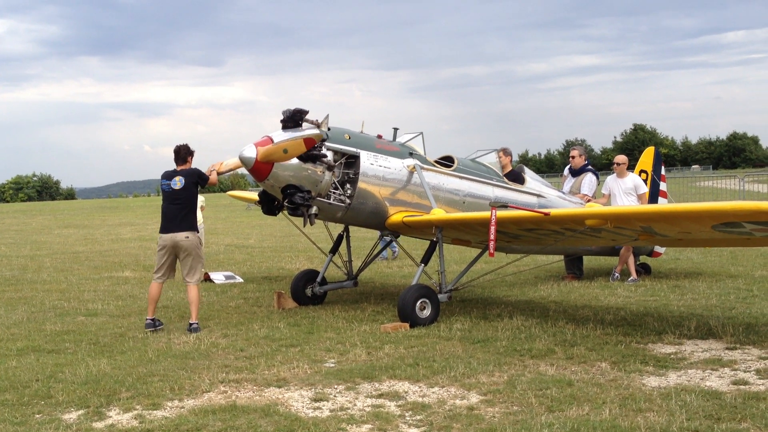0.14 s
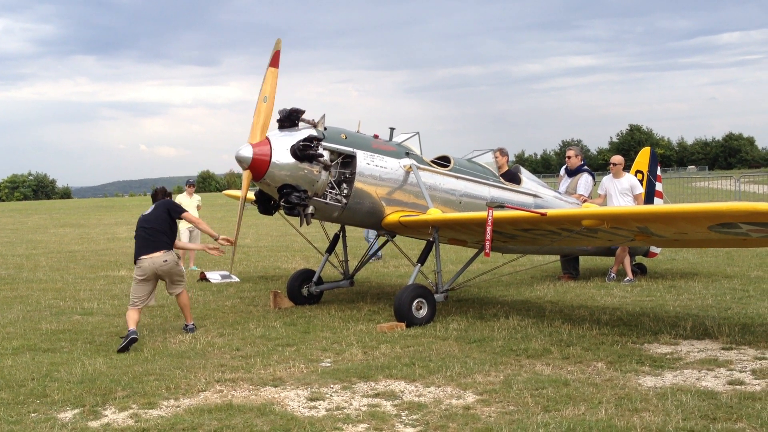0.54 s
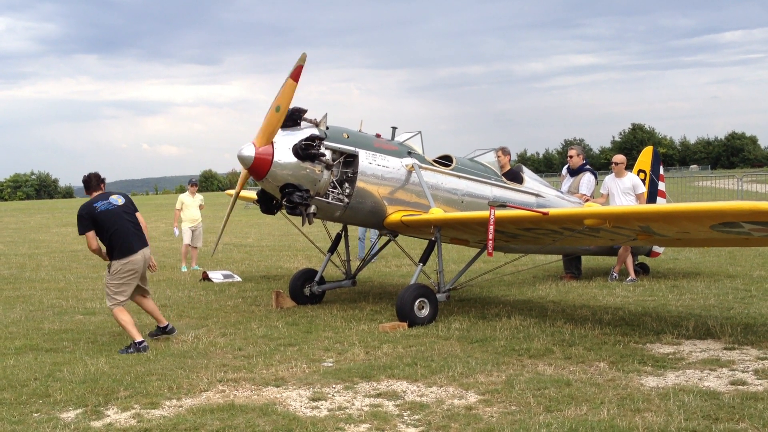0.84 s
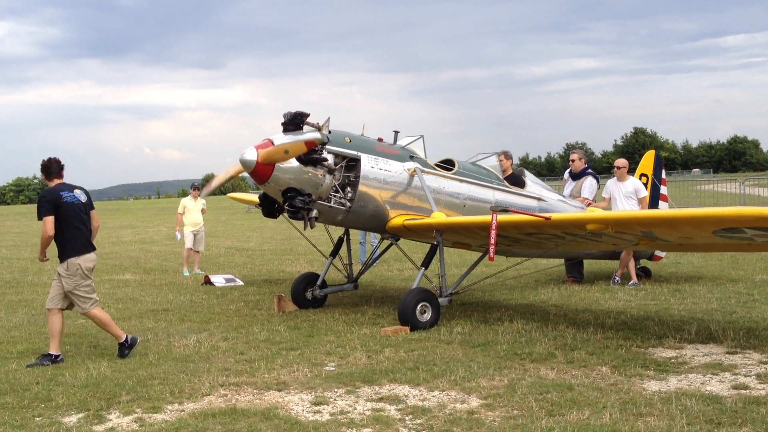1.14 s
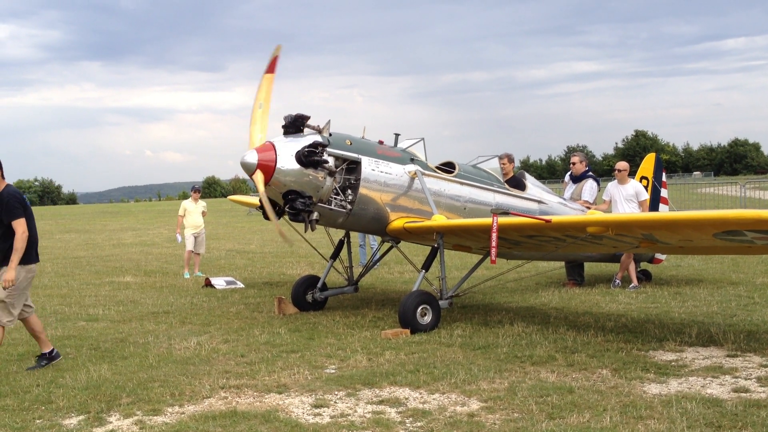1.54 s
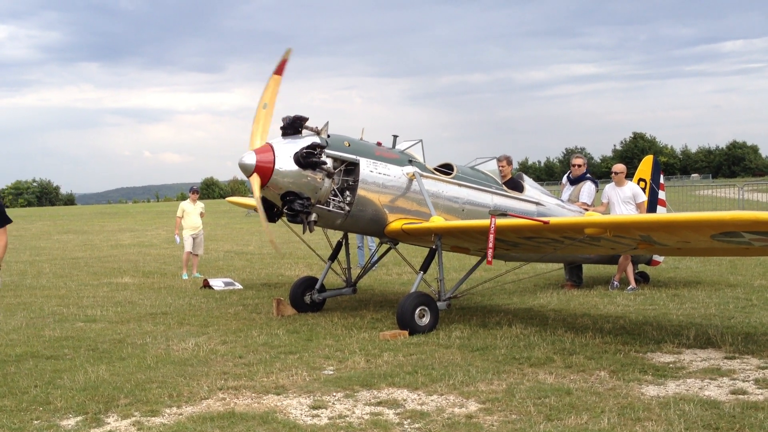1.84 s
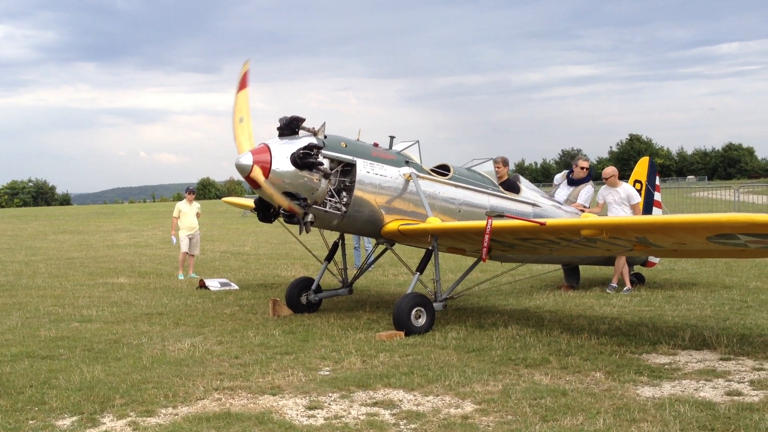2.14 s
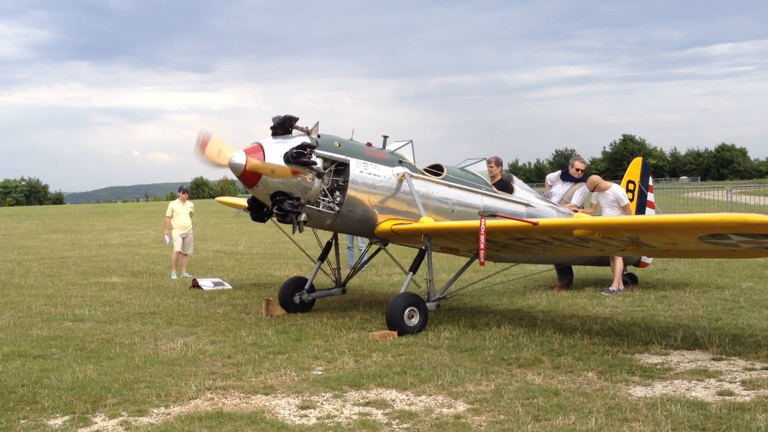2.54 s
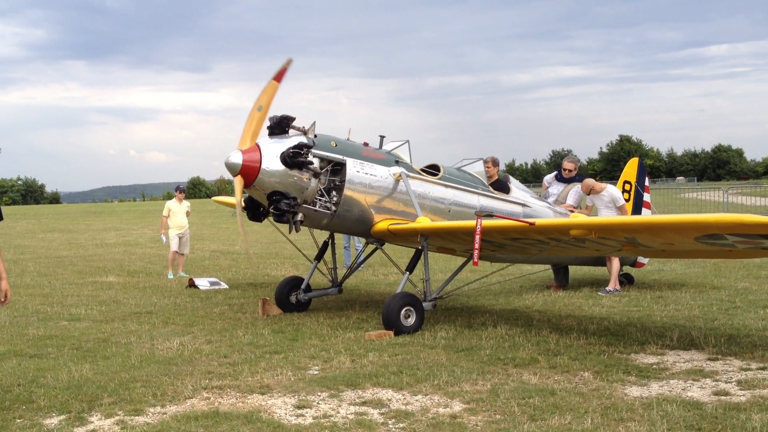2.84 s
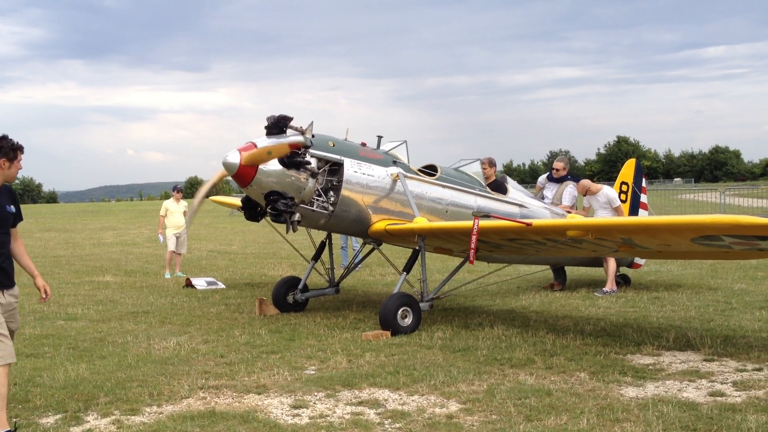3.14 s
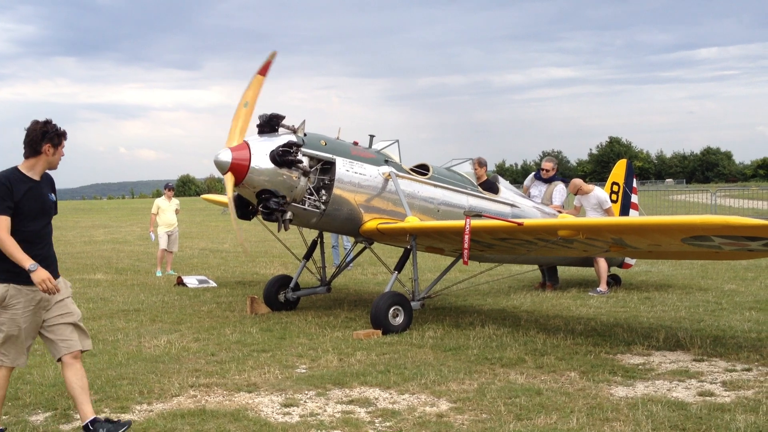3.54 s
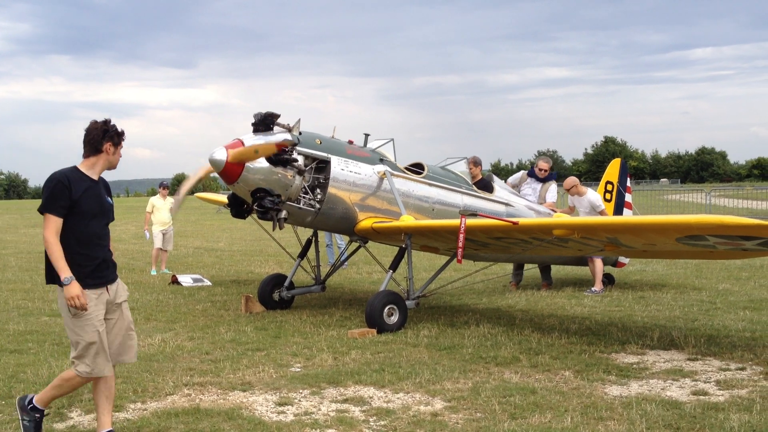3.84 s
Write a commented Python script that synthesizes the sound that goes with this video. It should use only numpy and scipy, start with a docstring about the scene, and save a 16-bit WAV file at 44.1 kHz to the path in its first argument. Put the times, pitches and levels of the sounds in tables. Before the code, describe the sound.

A radial aircraft engine starts by hand on a grass field: quiet knocks and wheezes, a cough, loud first bangs, then a fast, uneven popping idle with growing rumble and propeller hiss, picked up by one mono microphone.

```python
"""Radial engine hand-started on grass

A five-cylinder radial aircraft engine on a grass field is swung by hand, wheezes through two compressions,
catches and runs up to a popping idle. Each firing is a puff of rough noise coloured by its short stack pipe;
the two stacks nearest the microphone are loudest. Gliding tones make the low exhaust thumps, shaped noise the
rumble, roar and propeller hiss, and ringing tones the knocks and clicks of the valve gear.
Another engine throbs faintly far away as soft low tones over the open-air floor."""
import sys
import numpy as np
from scipy import signal
from scipy.fft import rfft, irfft
from scipy.io import wavfile
from scipy.ndimage import uniform_filter1d

SR = 44100
rng = np.random.default_rng(int(sys.argv[2]) if len(sys.argv) > 2 else 0)


def volts_from_db(level):
    """Convert decibel levels to linear amplitude ratios."""
    exponent = np.asarray(level, float) / 20
    return 10 ** exponent


def store_pcm(level_fs):
    """Save levels as 16-bit WAV."""
    pcm = np.round(np.clip(level_fs, -1, 1) * 32767).astype(np.int16)
    wavfile.write(sys.argv[1], SR, np.atleast_2d(pcm).T)


N = 176400  # samples, 4 s

# open-air floor of the field, spectrum: f/Hz, density/dB (relative)
AIR = [(18, -64), (30, -30), (160, 0), (256, -2.5), (315, -14), (379, -9), (897, -24), (7080, -36),
       (9940, -41), (15500, -35)]
AIR_DB = -56.5
# throbs of the far engine: t/s (10 ms after the onset), level/dB, f/Hz (middle of a small upward glide)
FAR_THROBS = [(0.051, -54, 162), (0.099, -48, 251), (0.168, -44, 223), (0.209, -44, 247), (0.288, -50, 154),
              (0.345, -44, 140), (0.379, -52, 153), (0.418, -50, 170), (0.476, -44, 182), (0.54, -53, 248),
              (0.6, -51, 134), (0.699, -71.5, 207), (0.759, -60, 156), (0.813, -56, 155), (0.869, -53, 122),
              (0.949, -49, 133), (0.999, -55, 148)]
THROB_S = .035  # whole length

# dull knocks of the valve gear during the swing: t/s, level/dB, f/Hz
KNOCKS = [(0.5, -43.5, 574), (0.559, -43, 570), (0.621, -45, 635), (0.685, -30.5, 522), (0.719, -38.5, 487),
          (0.775, -47, 620), (0.839, -46, 654), (0.914, -33, 1120), (0.952, -41, 540), (0.969, -32, 625),
          (0.985, -33, 580), (1.009, -36, 590), (1.031, -34, 584), (1.044, -37, 565)]
KNOCK_RISE_S, KNOCK_T60_S, KNOCK_RATTLE_DB = .005, .06, -7
# gliding squeak of a leaking valve: t/s, f/Hz, level/dB
SQUEAK = [(.55, 5200, -78), (0.581, 6200, -68), (.605, 7400, -64), (.65, 7500, -54), (.68, 7500, -83)]

# first firings, every cylinder in turn, starting with the third: t/s of the peak, level/dB
CATCH = [(1.082, -11.5), (1.1604, -13.5), (1.2253, -15), (1.2678, -11.5), (1.3201, -18), (1.3598, -16),
         (1.3967, -22.5), (1.4397, -27)]
# pops of the two near stacks, first and third cylinder in turn: t/s of the peak, level/dB
NEAR_POPS = [(1.471, -14.0), (1.5422, -16), (1.638, -12), (1.7017, -13.5), (1.7902, -14.5), (1.852, -14.5),
             (1.9391, -13.5), (2.0027, -20), (2.0878, -14.5), (2.1477, -16.5), (2.2313, -14.5),
             (2.2925, -18.5), (2.3769, -16), (2.4371, -17.5), (2.5202, -16.2), (2.5795, -15), (2.6634, -13),
             (2.7206, -16.5), (2.8031, -13.5), (2.8636, -19), (2.943, -16.5), (3.0017, -20), (3.0836, -16),
             (3.141, -18.5), (3.2237, -15.8), (3.281, -19.5), (3.3626, -17), (3.4193, -17), (3.5023, -14.5),
             (3.5599, -16.5), (3.6422, -17), (3.701, -17.5), (3.7826, -16.5), (3.8425, -16.5),
             (3.9249, -13.5), (3.9812, -15.5)]
IDLE_STEP_S = 0.03  # one of the five firing steps of a cycle, at idle

# engine power: t/s, thump level/dB, roar level/dB, hiss level/dB
POWER = [(1.061, -56, -40, -47), (1.086, -31, -50, -60), (1.13, -33, -40, -53), (1.2, -28, -37.5, -39.5),
         (1.265, -21.5, -38.5, -39), (1.33, -37, -41.5, -41.5), (1.5, -28, -39, -33.5),
         (1.8, -26.5, -36, -31), (2.3, -24, -33, -29), (3., -22, -30.5, -27.5), (3.6, -20, -29.5, -27),
         (4., -20, -30.5, -25)]
# exhaust rumble, spectrum: f/Hz, density/dB (relative)
RUMBLE = [(40, -50), (70, -26), (110, -2), (178, -11.5), (280, -1), (350, -29), (450, -42), (600, -90)]
RUMBLE_DB = -15  # relative to the thump level
# exhaust roar, spectrum: f/Hz, density/dB (relative)
ROAR = [(200, -48), (340, -12), (372, -12), (538, 1.5), (634, 3), (840, -20.5), (967, -3), (1250, -8.5),
        (1420, -11.5), (2000, -11.5), (2600, -46), (4400, -120)]
# propeller hiss, spectrum: f/Hz, density/dB (relative)
HISS = [(710, -11), (1200, -1.5), (1440, -10), (2290, -5.5), (2540, -10), (4220, -6.5), (5000, -11),
        (6650, -5), (9930, -16), (15000, -19.5)]
TICKS_PER_S, TICK_DB, TICK_SPREAD_DB = 500, -6, 3.34  # valve-gear clatter, level relative to the hiss

# low exhaust thumps of one cycle: half-length/s, start f/Hz, end f/Hz, level/dB (relative to thump level)
THUMPS = [(0.01543, 213, 161, -1.5), (0.0184, 111.6, 217, 0), (0.00914, 238, 308, -4.5),
          (.008, 213, 240, 2), (0.00852, 178, 183, -2), (0.01933, 110.7, 226, -3.5),
          (0.01076, 246, 272, -8), (0.0161, 135, 172, -5), (0.01214, 212.5, 274, -5.5),
          (0.00708, 1170, 1170, -9.5), (0.01104, 572, 690, -5.5), (.011, 612, 780, -9),
          (0.01094, 533, 563, -16), (0.0083, 631, 507, -14)]
# where each thump is centred: place/steps in the five-step cycle
THUMP_PLACES = [.3, .93, 1.3, 1.9, 2.37, 3., 3.5, 4.25, 4.8, 0., 1.1, 1.95, 3.1, 4.05]
THUMP_SPREAD_DB, THUMP_JITTER_S = 1.5, .0002

# body of the cough and the first bangs: t/s of the centre, half-length/s, f/Hz, level/dB
BANGS = [(.925, .014, 1150, -41), (.93, .018, 2215, -34), (.93, .014, 4150, -50), (.92, .01, 6900, -44),
         (1.075, .014, 248, -32), (1.085, 0.013, 1100, -22.5), (1.163, .016, 1180, -23.5),
         (1.165, 0.012, 1730, -24), (1.215, 0.013, 230, -36), (1.262, 0.01185, 259, -25),
         (1.268, 0.0092, 2320, -13.5), (1.226, .01, 4200, -16.5)]

# stacks on the far side: place/steps in the five-step cycle, cold level/dB, warm level/dB, spread/dB
FAR_STACKS = [(1.078, -22.5, -32, 7.5), (2.978, -31, -30.5, 3.5), (4.1, -40.5, -43, -1.5)]
# puffs while the propeller is swung: start t/s, level/dB, rise/s, decay/s, treble tilt/dB per octave
WHEEZES = [(.497, -51, 0.0027, 0.02, 3), (.611, -52, 0.0044, 0.063, -10.5), (0.683, -52, 0.0023, 0.046, -7),
           (0.727, -53, 0.0016, .008, -10), (0.767, -58, .003, 0.018, -12), (.813, -50, 0.0037, 0.023, -13),
           (.831, -45.5, 0.0025, 0.023, 2), (0.871, -53, 0.0037, 0.026, -18),
           (.906, -33.5, 0.025, 0.021, -3), (.952, -33.5, 0.0014, 0.017, -20),
           (0.973, -48.5, 0.0068, 0.082, -11), (1.028, -47, .004, 0.073, -11)]
WHEEZE_RING = 1.1  # slow gas rings the pipes more: factor on the resonance dB
# gas noise before the pipe, spectrum: f/Hz, density/dB (relative)
PUFF = [(290, -44), (500, -14), (1140, -8.5), (1450, -8), (2230, -0.5), (2570, -2), (6480, -6.5),
        (9510, -12.5), (11300, -13), (15000, -15)]
# resonances of the stack pipe: f/Hz, width/Hz, boost/dB
STACK = [(1150, 280, 9), (2225, 83, 4.5), (2840, 67, 1), (4200, 137, 8.5), (6760, 2100, 5)]
# colour of each cylinder: level/dB added at the top resonance, treble tilt/dB per octave
COLOUR = [(1.5, 2), (3, 1), (3, 1), (0, -0.5), (-8.5, -1.5)]
RING_SPREAD_DB, LUMPS_DB = 1.5, 2.5  # each puff has its own resonances and uneven colour
CRACKLE_DB = 2  # roughness inside a puff
COLD_TILT_DB, WARM_S = 3., 0.5  # a cold engine spits brighter (dB per octave); time to warm
SLOW_POWER, SLOW_MAX = 0.85, 2.1  # puffs stretch as the firing steps grow; longest stretch
# puff shape at idle speed; JUMP is the share of the peak reached at once
RISE_S, RISE_POWER, FALL_S, JUMP = .0065, 1.1, .0028, 0.071
TAIL_S, TAIL_DB = .011, -9
TREBLE_HZ, TREBLE_JUMP, TREBLE_LEAD = 8300, 0.24, 0.67  # the treble leaps in at once and peaks early

EDGE_HZ = 15450  # upper band edge of the microphone


def evened(x):
    """Scaled to an rms of one."""
    return x / np.sqrt(np.mean(x ** 2, -1, keepdims=True) + 1e-20)


def read(points, hz):
    """Spectrum level in dB, interpolated along log frequency."""
    f, value = np.transpose(points)
    return np.interp(np.log(hz + 1), np.log(f + 1), value)


def add(mix, s, sound):
    """Lays a sound into the mix from s seconds on."""
    at = max(round(s * SR), 0)
    part = mix[at:at + len(sound)]
    part += sound[:len(part)]


def noise(spectrum, patchy_db, size=512):
    """Random short-time spectra with small drifting patches."""
    hop = size // 4
    a, b, patch = rng.standard_normal((N // hop + 5, size // 2 + 1, 3)).T
    patch = uniform_filter1d(uniform_filter1d(patch, size=6, axis=0), size=5, axis=1)
    level_db = read(spectrum, np.fft.rfftfreq(size, 1 / SR))[:, None] + patchy_db * patch / patch.std()
    z = (a + 1j * b) * volts_from_db(level_db)
    return evened(signal.istft(z, nperseg=size, noverlap=size - hop)[1][:N])


def burst(half_s, start_hz, end_hz):
    """A short soft-edged tone that glides."""
    u = np.arange(0, 2 * half_s, 1 / SR) / (2 * half_s)
    phase = 2 * np.pi * np.cumsum(start_hz + (end_hz - start_hz) * u) / SR
    return np.sin(np.pi * u) ** 2 * np.sin(phase)


def field():
    """Open-air floor of the grass field with the far engine's throbs."""
    out = volts_from_db(AIR_DB) * noise(AIR, 0.84, size=1024)
    for at, db, hz in FAR_THROBS:
        add(out, at - .01, volts_from_db(db) * burst(THROB_S / 2, hz * 0.93, hz * 1.1))
    return out


def knocks():
    """Valve-gear knocks: two decaying tones, the second at random pitch, and a band of rattle noise."""
    out, t = np.zeros(N), np.arange(6000) / SR
    band = signal.butter(2, [430, 950], "band", fs=SR, output="sos")
    for at, db, hz in KNOCKS:
        rattle = evened(signal.sosfilt(band, rng.standard_normal(len(t))))
        main = np.sin(2 * np.pi * hz * t)
        second = .5 * np.sin(2 * np.pi * (hz * rng.uniform(0.78, 1.25) * t + rng.random()))
        ring = main + second + volts_from_db(KNOCK_RATTLE_DB) * rattle
        add(out, at, volts_from_db(db - 60 * t / KNOCK_T60_S) * np.minimum(t / KNOCK_RISE_S, 1) * ring)
    return out


def squeak():
    """A leaking valve whistles: a gliding tone whose strength wavers at random."""
    s, hz, db = np.transpose(SQUEAK)
    t = np.arange(N) / SR
    waver = evened(signal.lfilter([.02], [1, -.98], rng.standard_normal(N)))
    tone = np.sin(2 * np.pi * np.cumsum(np.interp(t, s, hz)) / SR)
    return volts_from_db(np.interp(t, s, db, -200, -200)) * waver * tone


def power(column, t):
    """Gain of one layer at times t, following the engine power."""
    rows = np.transpose(POWER)
    return volts_from_db(np.interp(t, rows[0], rows[column]))


def crank():
    """Firing steps and times that are known; step 0 is the first cylinder."""
    k = np.arange(len(NEAR_POPS) + 2)  # two more pops follow at idle speed, past the table
    steps = np.r_[np.arange(len(CATCH)) - len(CATCH), 5 * (k // 2) + 2 * (k % 2)]
    s = np.array([row[0] for row in CATCH + NEAR_POPS])
    return steps, np.r_[s, s[-2:] + 5 * IDLE_STEP_S]


def ticks():
    """Dense small clicks of the valve gear, ringing at the pipe resonances."""
    size_db = TICK_SPREAD_DB * np.minimum(rng.exponential(1, N), 4)
    size = volts_from_db(size_db) * (rng.random(N) < TICKS_PER_S / SR)
    t, which = np.arange(150) / SR, rng.integers(0, len(STACK), N)
    out = np.zeros(N)
    for k, (hz, _, _) in enumerate(STACK):
        click = np.exp(-t / 0.00055) * np.sin(2 * np.pi * hz * t)
        out += signal.oaconvolve(size * (which == k), click)[:N]
    return evened(out)


def rush():
    """Exhaust rumble, and roar and propeller hiss that throb with the firings."""
    t = np.arange(N) / SR
    steps, s = crank()
    beat = np.cos(2 * np.pi * (np.interp(t, s, steps) - .1))
    rumble = power(1, t) * volts_from_db(RUMBLE_DB) * noise(RUMBLE, 0.63, size=1024)
    roar = power(2, t) * volts_from_db(2.15 * beat) * noise(ROAR, 1.4)
    hiss = power(3, t) * volts_from_db(2.34 * beat) * (noise(HISS, 3.2) + volts_from_db(TICK_DB) * ticks())
    return (rumble + roar + hiss) * (t > POWER[0][0])


def thumps():
    """Low pressure pulses of the exhaust, tied to the crank and nearly alike each cycle."""
    steps, s = crank()
    keep = (steps < 0) | (steps % 5 == 0)  # time runs evenly between pops of the first cylinder
    out, luck = np.zeros(N), rng.standard_normal((21, len(THUMPS), 2))
    for turn in range(21):
        for place, (half_s, start_hz, end_hz, db), (a, b) in zip(THUMP_PLACES, THUMPS, luck[turn]):
            step = 5 * (turn - 2) + place
            if step >= steps[0] - .5:
                t = np.interp(step, steps[keep], s[keep]) + THUMP_JITTER_S * b
                gain = power(1, t) * volts_from_db(db + THUMP_SPREAD_DB * a)
                add(out, t - half_s, gain * burst(half_s, start_hz, end_hz))
    return out


def bangs():
    """Single pipe and cowling tones of the cough and the first firings."""
    out = np.zeros(N)
    for at, half_s, hz, db in BANGS:
        add(out, at - half_s, volts_from_db(db) * burst(half_s, hz, hz))
    return out


def gas(cylinder, tilt_db, ring=1, size=8192):
    """Rough noise coloured by the resonances of one stack pipe."""
    hz = np.fft.rfftfreq(size, 1 / SR)
    f, width, db = np.transpose(STACK)
    top_db, own_tilt_db = COLOUR[cylinder]
    db = ring * db + RING_SPREAD_DB * rng.standard_normal(len(f)) + top_db * (f == f.max())
    bumps = 1 / (1 + (2 * (hz - f[:, None]) / width[:, None]) ** 2)
    uneven = uniform_filter1d(uniform_filter1d(rng.standard_normal(len(hz)), size=60), size=60)
    tilt = (own_tilt_db + tilt_db) * np.log2(1 + hz / 3000)
    colour = read(PUFF, hz) + LUMPS_DB * evened(uneven) + db @ bumps + tilt
    rough = volts_from_db(CRACKLE_DB * evened(uniform_filter1d(rng.standard_normal(size), size=30)))
    return rough * evened(irfft(rfft(rng.standard_normal(size)) * volts_from_db(colour)))


def wheezes():
    """Gas pressed slowly through the pipes while the propeller is swung."""
    out, t = np.zeros(N), np.arange(8192) / SR
    for at, db, rise, decay, tilt_db in WHEEZES:
        shape = np.minimum(t / rise, 1) * np.exp(-np.maximum(t - rise, 0) / decay)
        add(out, at, volts_from_db(db) * shape * gas(0, tilt_db, WHEEZE_RING))
    return out


def puffs():
    """One burst of gas per firing, longer when the engine turns slowly, its treble peaking first."""
    steps, s = crank()
    gap = np.gradient(s) / np.gradient(steps)  # seconds per firing step
    rows = [(*row, k % 5) for row, k in zip(CATCH + NEAR_POPS, steps)]
    luck = rng.standard_normal((18, len(FAR_STACKS)))
    for turn in range(18):
        warm = turn / 17
        for (place, cold_db, warm_db, spread_db), z in zip(FAR_STACKS, luck[turn]):
            at = np.interp(5 * turn + place, steps, s)
            rows.append((at, cold_db + (warm_db - cold_db) * warm + spread_db * z, round(place)))
    out, t = np.zeros(N), np.arange(8192) / SR
    treble_cut = 1 + (TREBLE_HZ / np.fft.rfftfreq(len(t), 1 / SR).clip(1)) ** 6
    for at, db, cylinder in rows:
        slow = min((np.interp(at, s, gap) / IDLE_STEP_S) ** SLOW_POWER, SLOW_MAX)
        u = np.maximum(t / slow - RISE_S, 0)  # time past the peak, as at idle
        tail = volts_from_db(TAIL_DB) * (np.exp(-u / TAIL_S) - np.exp(-u / FALL_S))
        fall = np.exp(-(u / FALL_S) ** 2 / 2) + tail
        rise = np.minimum(t / slow / RISE_S, 1) ** RISE_POWER
        early_rise = np.minimum(t / slow / (RISE_S * TREBLE_LEAD), 1)
        shape = (JUMP + (1 - JUMP) * rise) * fall
        early = (TREBLE_JUMP + (1 - TREBLE_JUMP) * early_rise) * fall
        jet = gas(cylinder, COLD_TILT_DB * np.exp(-(at - s[0]) / WARM_S))
        treble = irfft(rfft(jet) / treble_cut)
        add(out, at - RISE_S * slow, volts_from_db(db) * (shape * (jet - treble) + early * treble))
    return out


def scene():
    """The field, the swing and the running engine, on one channel."""
    background = field() + knocks() + squeak()
    engine = rush() + thumps() + bangs() + wheezes() + puffs()
    return (background + engine)[None]


def top_cut(x):
    """Nothing passes above the cut-off."""
    return signal.sosfilt(signal.butter(12, 16460, fs=SR, output="sos"), x)


def record(dry):
    """Soft overload, low cut and upper band edge of the microphone."""
    rounded = np.tanh(dry)  # the input stage rounds off peaks
    cut = signal.sosfilt(signal.butter(4, 72, "high", fs=SR, output="sos"), rounded)
    edge = signal.firwin(301, EDGE_HZ, window=("kaiser", 6), fs=SR)
    mix = signal.oaconvolve(cut, edge[None], "same")
    return top_cut(mix)


dry = scene()
out = record(dry)
store_pcm(out)
```